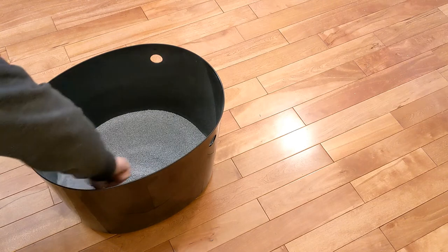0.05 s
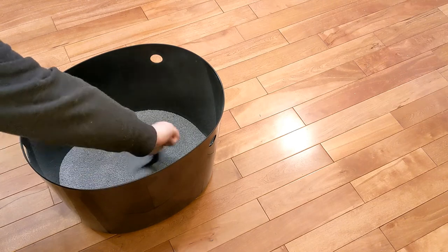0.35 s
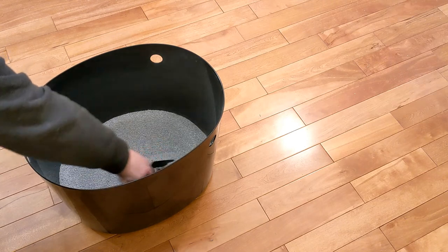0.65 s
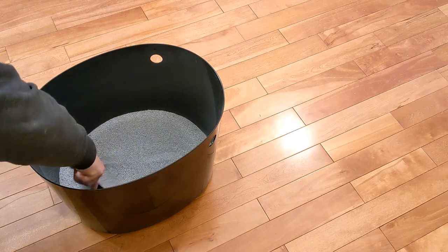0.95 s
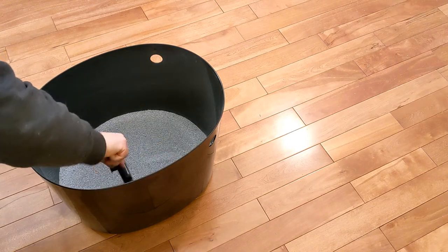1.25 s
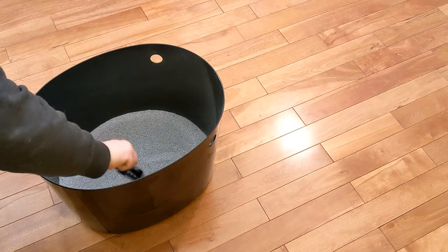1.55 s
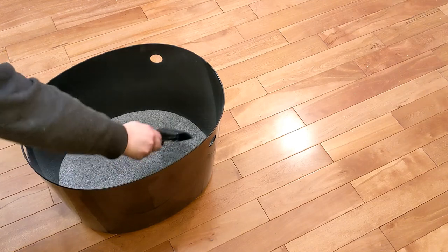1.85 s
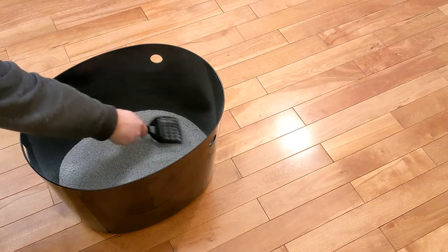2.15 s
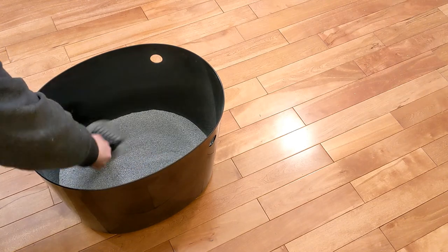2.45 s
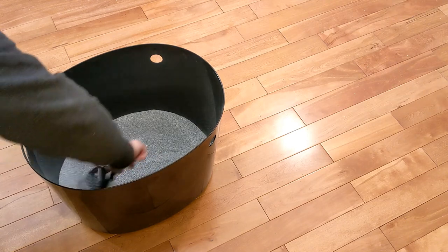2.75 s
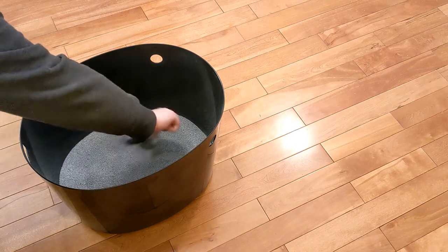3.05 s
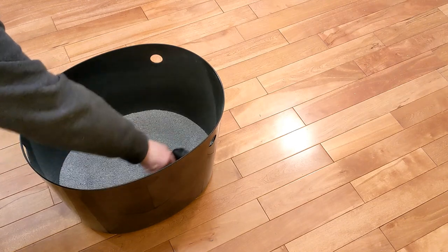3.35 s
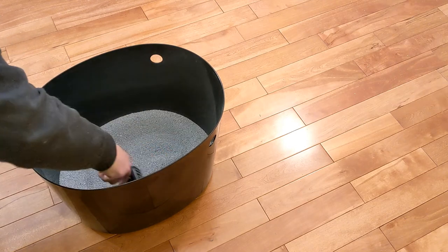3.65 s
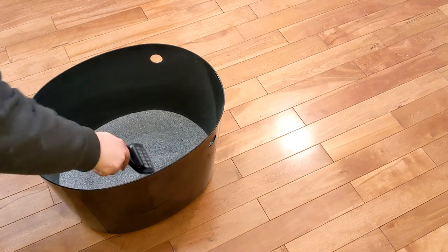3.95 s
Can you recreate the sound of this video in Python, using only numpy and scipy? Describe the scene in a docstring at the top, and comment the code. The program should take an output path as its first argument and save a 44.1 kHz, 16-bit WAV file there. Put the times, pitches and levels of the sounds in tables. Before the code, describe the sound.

A plastic scoop rakes through cat litter in hissing strokes, twice knocking the plastic tub.

```python
"""Scooping cat litter

A plastic scoop rakes litter in a plastic tub on a wooden floor, in a live room with mains hum.
Grains hiss under the scoop, spray against the wall at stroke ends and trickle off it when lifted.
The edge crunches in; the scoop scrapes the tub floor once and twice knocks the tub, which rings."""
import sys
import numpy as np
from scipy import signal
from scipy.fft import rfft, irfft
from scipy.io import wavfile

SR = 44100
rng = np.random.default_rng(int(sys.argv[2]) if len(sys.argv) > 2 else 0)


def master(y):
    """Save y as 16-bit WAV."""
    cut = np.clip(np.atleast_2d(y).T, -1, 1)
    pcm = np.round(cut * 32767)  # scale
    wavfile.write(sys.argv[1], SR, pcm.astype(np.int16))


N = 176400
T = np.arange(N) / SR

# scoop vigour, one curve per spell of raking: t/s, level/dB
RAKE_SPELLS = [
    [(0, -49.5), (.1, -51), (.2, -51), (.48, -50.5), (.55, -55), (.68, -54), (.86, -48.3), (.98, -52.5),
     (1.11, -60), (1.2, -58.5), (1.32, -66), (1.39, -80)],
    [(2.16, -59.5), (2.21, -58), (2.3, -53), (2.4, -52.5), (2.52, -55.5), (2.61, -54), (2.78, -60),
     (2.94, -61.5), (3.11, -53.3), (3.23, -58), (3.35, -55.5), (3.47, -62), (3.66, -63.3), (3.9, -80)],
]
# grains on the scoop: f/Hz, relative density/dB
RAKE_SPECTRUM = [(800, -11), (1400, -3), (1860, -4), (2500, -.5), (3400, -3), (4000, 0), (4800, -2.5),
                 (5400, 0), (6400, -3), (7100, -1), (8000, -3), (9500, 0.5), (10600, -2), (11600, 2),
                 (13300, -5), (15800, -7.5)]
# litter sprays against the wall; at 2.55 s the scoop scrapes along the tub floor:
# start/s, rise/s, 20 dB fall/s, level/dB, relative patter/dB, L-R/dB
SPRAYS_AND_SCRAPE = [(.11, 0.048, 0.1134, -37, -8, -1), (.575, 0.018, .1, -40.5, -9.5, -3),
                     (.79, .06, .15, -52, -12, -3), (1.12, .03, .09, -40.5, -9.5, -0.5),
                     (2.55, .1, .26, -57.5, 6, 0), (2.85, 0.023, 0.7, -55.5, -12, -1.5),
                     (3.215, 0.023, 0.09, -49, -11, -3), (3.24, .09, .095, -41.7, -5.5, -1),
                     (3.6, .04, .12, -63, -4, -3)]
# grains on plastic: f/Hz, relative density/dB
SIZZLE_SPECTRUM = [(1500, -14), (3000, -12), (7000, -11), (9600, -5.5), (10700, -7), (11400, 1), (12500, 3),
                   (13300, -2), (16000, -6.5)]
# response of tub wall or floor: f/Hz, relative density/dB
PATTER_SPECTRUM = [(200, -22), (520, -9), (760, -10), (1050, 1.5), (1350, 0.5), (1800, -11), (2500, -12),
                   (4000, -32)]
# scoop-tub contacts, one list per spot: t/s, level/dB, low-pass f/Hz, relative crack/dB
KNOCK_CONTACTS = [
    [(.1628, -26.5, 2500, -7), (.1705, -33, 450, 0), (.1795, -33.5, 1800, -2), (.198, -38, 1800, 3)],
    [(2.368, -37, 1800, 4), (2.373, -28.5, 3500, 8), (2.3855, -25.5, 350, 0), (2.407, -35, 1100, 2)],
]
# tub modes: f/Hz, level at spot 0/dB, level at spot 1/dB, T60/s
TUB_MODES = [(228, -12, -8, .2), (269, -9, -5, .22), (320, -20, -15, 0.17), (360.8, -11, -15, .18),
             (509, -23, -8, .18), (575, -10, -11, .12), (740, -17, -8, .12), (952, -8, -12, 0.044),
             (1014, 0, -15, .06), (1067, -2, -14, .055), (1149, -6.5, -8.5, .08), (1396, -8, -3, .08),
             (1648, -17, -10.5, .07), (1900, -17, -13, .04), (2430, -16, -8, 0.05)]
# damped plastic: f/Hz, relative density/dB
THWACK_SPECTRUM = [(100, -22), (220, 2), (600, -2), (850, -3), (1400, -4), (2600, -8), (3400, -20),
                   (8000, -29)]
# edge entering the litter: t/s, level/dB
DIG_BURSTS = [(2.1518, -44), (2.203, -52)]
# grains off the lifted scoop: start/s, rise/s, 20 dB fall/s, level/dB
TRICKLE_BURSTS = [(1.46, .04, 0.3, -74), (1.57, 0.023, 0.04, -73), (1.7, 0.028, 0.31, -70),
                  (1.82, 0.21, .9, -74.5), (3.77, .02, .3, -70)]
# room rumble and hiss: f/Hz, relative density/dB
AIR_SPECTRUM = [(25, -23), (40, -13), (55, -2), (68, -5), (83, 2), (100, -9), (160, -3.5), (200, -8),
                (290, -8), (420, -14.5), (700, -22), (1020, -21), (1700, -31.5), (4000, -37.5),
                (8000, -44.5), (15000, -49)]
# hum lines: f/Hz, rms level/dB
HUM_LINES = [(56, -66), (83, -59), (120, -50.5), (157, -66.5), (1005, -80)]
# room decay: f/Hz, T60/s
ROOM_DECAY = [(200, .65), (1000, .52), (4000, .47), (9000, 0.3), (15000, .21)]
# diffuse field: f/Hz, L-R correlation
EAR_CORRELATION = [(60, 0.77), (130, .88), (300, 0.6), (600, .78), (1100, .55), (2000, 0.097),
                   (15000, 0.18)]
# microphone mismatch: f/Hz, L-R/dB
MIC_TILT = [(500, 0), (1000, -1), (2000, 0), (4500, 1), (8500, -1.5), (12000, -0.5), (15000, 5)]

SCOOP_GRAINS_PER_S, SCOOP_PAN_DB = 13000, -1.8


def raking(gain_db=4, onset_s=.005, settle_s=.08):
    """Grains rub past the scoop, denser and louder with vigour."""
    vigour = 0
    for spell in RAKE_SPELLS:
        times, db = np.transpose(spell)
        onset = np.clip((T - times[0]) / onset_s + 2, 0, 1)
        settle = np.exp(-np.maximum(T - times[-1], 0) / settle_s)
        vigour = vigour + from_db(np.interp(T, times, db)) * onset * settle
    flow = np.sqrt(vigour / vigour.max()) + .05
    hits = grains(SCOOP_GRAINS_PER_S * flow) / np.sqrt(flow)
    hiss = butter(coloured(hits, RAKE_SPECTRUM), 790, "high")
    return panned(from_db(gain_db) * vigour * hiss, SCOOP_PAN_DB)


def grains(per_s, spread_db=3.4, clump_db=1.0, clump_hz=28):
    """Tiny uneven collisions in loose clumps; wall scatter gives each ear a random sign."""
    sizes = from_db(spread_db * np.minimum(rng.exponential(1, N), 5))
    occurs = rng.random(N) < per_s / SR
    signs = rng.choice([-1, 1], (2, N))
    return sizes * occurs * signs * from_db(clump_db * drift(clump_hz))


def sprays_and_scrape():
    """Litter sprays against the wall, or the scoop scrapes the tub floor: grains sizzle, tub patters."""
    hits = grains(per_s=9000)
    sizzle, patter = coloured(hits, SIZZLE_SPECTRUM), coloured(hits, PATTER_SPECTRUM)
    out = 0
    for start_s, rise_s, fall_s, db, patter_db, pan_db in SPRAYS_AND_SCRAPE:
        level = from_db(db) * burst(start_s, rise_s, fall_s)
        out = out + panned(level * (sizzle + from_db(patter_db) * patter), pan_db)
    return out


def knocks(thwack_db=-2, thwack_t60_s=.052):
    """Scoop hits tub: sharp crack, dull thwack of damped plastic, modal ring."""
    out, t = 0, T[:SR // 2]
    crack = butter(1.0 * (t == 0), [600, 2000], "band")
    crack /= np.abs(crack).max()
    thwack_level = from_db(thwack_db - 60 * t / thwack_t60_s)
    for spot, contacts in enumerate(KNOCK_CONTACTS):
        ring = 0
        for k, (hz, *spot_db, t60_s) in enumerate(TUB_MODES):
            level = from_db(spot_db[spot] - 60 * t / t60_s)
            ring = ring + (-1) ** (k // 2) * level * np.sin(2 * np.pi * hz * t)
        for start_s, db, lowpass_hz, crack_db in contacts:
            thwack = coloured(rng.standard_normal(len(t)), THWACK_SPECTRUM) * thwack_level
            blow = butter(from_db(crack_db) * crack + ring + thwack, lowpass_hz, "low", order=1)
            out = out + np.pad(from_db(db) * blow, (int(start_s * SR), N))[:N]
    return panned(butter(out, 150, "high"), pan_db=-.9)


def digs():
    """Short bright crunch as the edge lands."""
    crunch = unit_rms(butter(grains(SCOOP_GRAINS_PER_S), [7000, 13000], "band", order=1))
    level = sum(from_db(db) * burst(start_s, rise_s=.00089, fall_s=.011) for start_s, db in DIG_BURSTS)
    return panned(level * crunch, pan_db=-8)


def trickle():
    """Sparse grains fall off the lifted scoop."""
    level = sum(from_db(db) * burst(*timing_s) for *timing_s, db in TRICKLE_BURSTS)
    return panned(level * coloured(grains(per_s=2500), RAKE_SPECTRUM), SCOOP_PAN_DB)


def room_echoes(x, gap_s=.0031, early_t60_s=.13):
    """Strong early echoes, then a diffuse tail; treble dies first. New pattern per call."""
    tail, t = 0, T[:SR * 2 // 3]
    edges_hz = np.geomspace(100, 20000, 10)
    noises = diffuse(len(t)), diffuse(len(t))
    for k, (low, high) in enumerate(zip(edges_hz, edges_hz[1:])):
        t60_s = at_hz(ROOM_DECAY, np.sqrt(low * high))
        tail = tail + butter(noises[k % 2], [low, high], "band") * from_db(-60 * t / t60_s)
    onset = np.clip(t / gap_s - 1, 0, 1)
    early_boost = 1 + from_db(-60 * t / early_t60_s)
    response = unit_rms(tail * onset * early_boost) / np.sqrt(len(t))
    return signal.fftconvolve(x, response, axes=1)[:, :N]


def moving_echoes(x, places_per_s=22, count=3):
    """The scoop travels: cyclic crossfade between echo patterns."""
    offset = T * places_per_s - np.arange(count)[:, None]
    distance = np.abs((offset + count / 2) % count - count / 2)
    shares = np.cos(np.pi / 2 * np.minimum(distance, 1))
    return sum(room_echoes(x * share) for share in shares)


def at_ears(x, echoes, wet_db, right_lead_s=.00013):
    """Direct sound, right ear first, plus echoes."""
    left = np.pad(x[0], (round(right_lead_s * SR), 0))[:N]
    wet = from_db(wet_db)
    return (np.array([left, x[1]]) + wet * echoes) / np.hypot(1, wet)


def background(air_db=-53.7):
    """Room rumble, faint hiss, appliance hum."""
    hum = sum(np.sqrt(2) * from_db(db) * np.sin(2 * np.pi * (hz * T + rng.random()))
              for hz, db in HUM_LINES)
    return from_db(air_db) * coloured(diffuse(N), AIR_SPECTRUM) + hum


def diffuse(size):
    """Stereo noise, correlated in the bass, barely so in the treble."""
    alike = at_hz(EAR_CORRELATION, np.fft.rfftfreq(size, 1 / SR))
    mid, side = rfft(rng.standard_normal((2, size)))
    return irfft(np.sqrt(1 + alike) * mid + np.sqrt(1 - alike) * np.array([side, -side]), size)


def drift(hz):
    """Slow random wander, unit rms."""
    pole = np.exp(-2 * np.pi * hz / SR)
    return unit_rms(signal.lfilter([1], [1, -2 * pole, pole * pole], rng.standard_normal(N + SR))[SR:])


def burst(start_s, rise_s, fall_s):
    """Smooth rise, then -20 dB per fall_s."""
    rise = np.sin(np.pi / 2 * np.clip((T - start_s) / rise_s, 0, 1)) ** 2
    return rise * from_db(-20 * np.maximum(T - start_s - rise_s, 0) / fall_s)


def coloured(x, spectrum):
    """Spectral shaping to unit rms."""
    n = x.shape[-1]
    gain = from_db(at_hz(spectrum, np.fft.rfftfreq(n, 1 / SR)))
    return unit_rms(irfft(rfft(x) * gain, n))


def butter(x, hz, kind, order=2):
    """Causal Butterworth filter."""
    return signal.sosfilt(signal.butter(order, hz, kind, fs=SR, output="sos"), x + 1e-18)


def at_hz(table, hz):
    """Table lookup over log frequency."""
    table_hz, values = np.transpose(table)
    return np.interp(np.log(np.maximum(hz, 1)), np.log(table_hz), values)


def panned(x, pan_db):
    """Pan by L-R level."""
    return x * from_db([[pan_db / 2], [-pan_db / 2]])


def from_db(db):
    return 10 ** (np.asarray(db) / 20)


def unit_rms(x):
    return x / np.sqrt(np.mean(x ** 2) + 1e-20)


def scene():
    """Litter and tub in the room, over the background."""
    litter = raking() + trickle() + sprays_and_scrape() + digs()
    tub = knocks()
    tub_in_room = at_ears(tub, room_echoes(tub), wet_db=-2)
    litter_in_room = at_ears(litter, moving_echoes(litter), wet_db=-1.5)
    return litter_in_room + tub_in_room + background()


def record(dry, cutoff_hz=15900):
    """Microphone mismatch, then a steep low-pass."""
    tilt_db = at_hz(MIC_TILT, np.fft.rfftfreq(N, 1 / SR))
    heard = irfft(rfft(dry) * from_db([tilt_db / 2, -tilt_db / 2]), N)
    return signal.sosfilt(signal.ellip(12, .1, 80, cutoff_hz, fs=SR, output="sos"), heard)


dry = scene()
out = record(dry)
master(out)
```